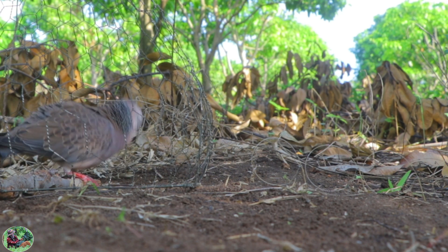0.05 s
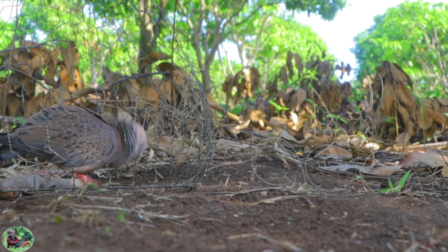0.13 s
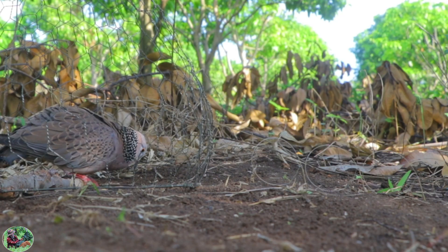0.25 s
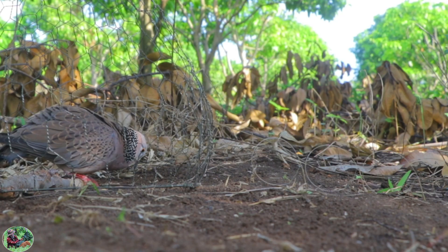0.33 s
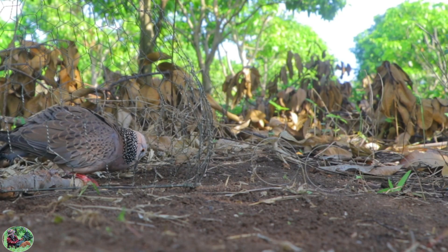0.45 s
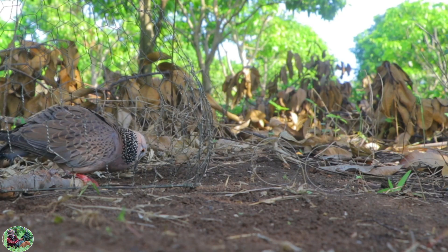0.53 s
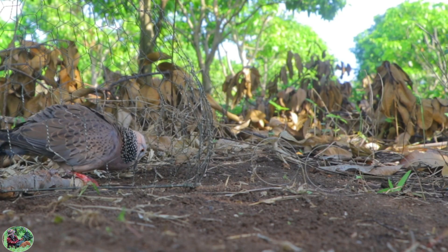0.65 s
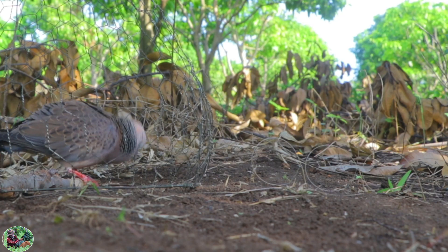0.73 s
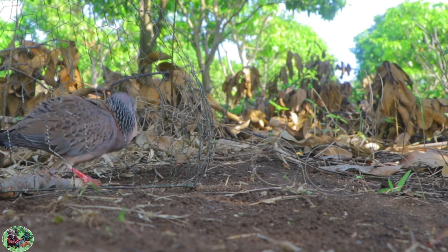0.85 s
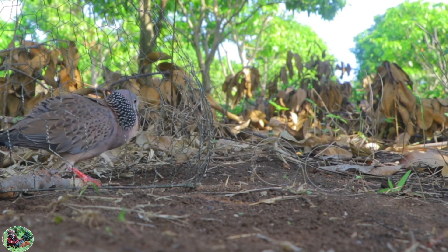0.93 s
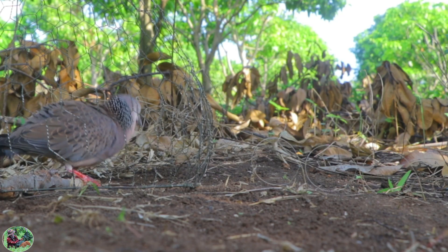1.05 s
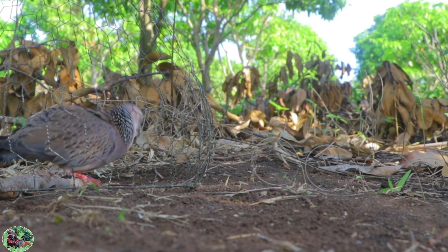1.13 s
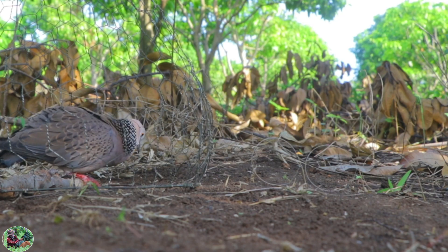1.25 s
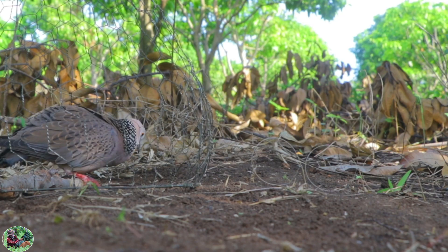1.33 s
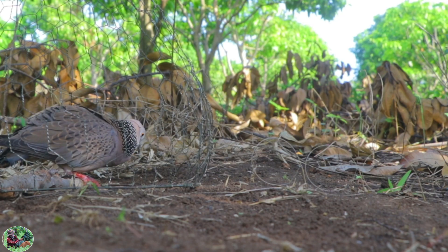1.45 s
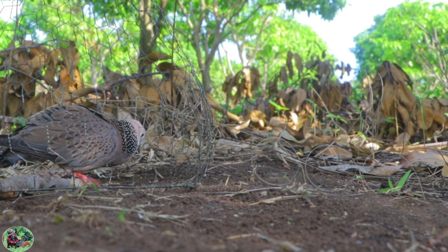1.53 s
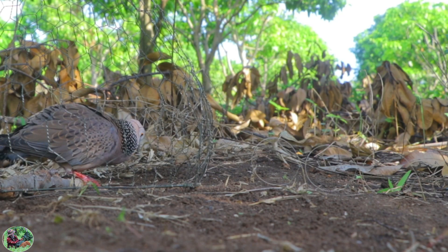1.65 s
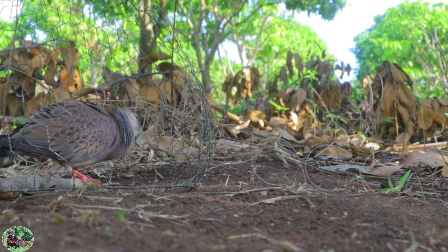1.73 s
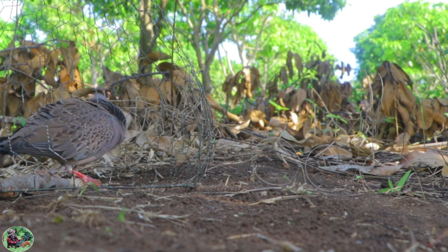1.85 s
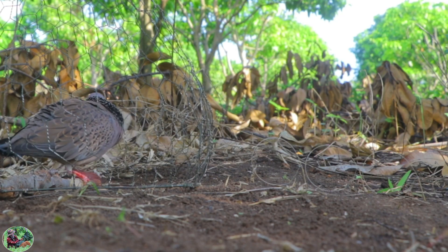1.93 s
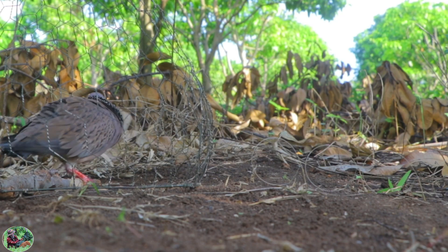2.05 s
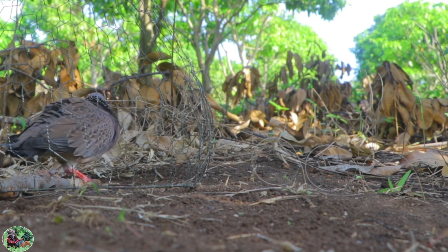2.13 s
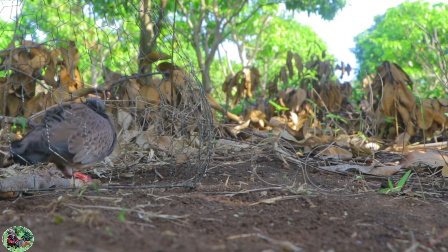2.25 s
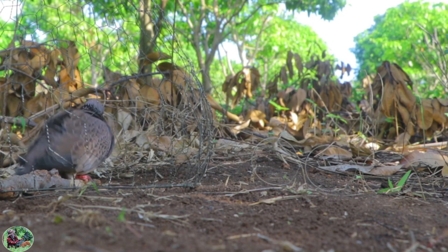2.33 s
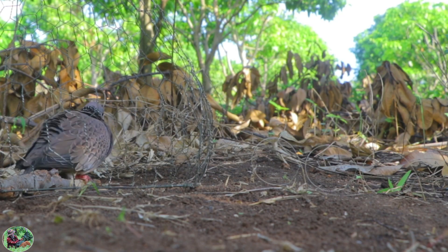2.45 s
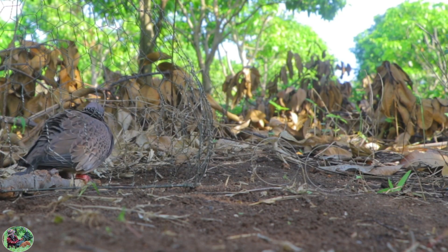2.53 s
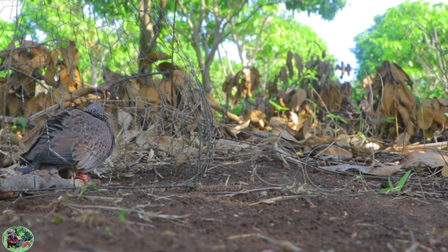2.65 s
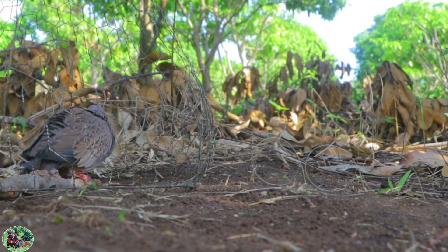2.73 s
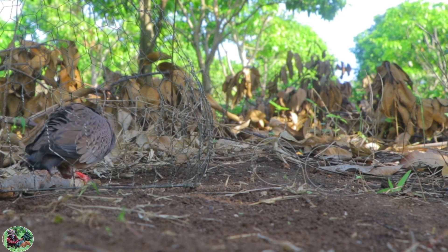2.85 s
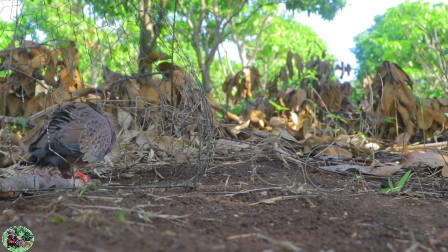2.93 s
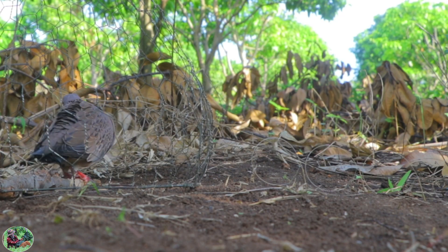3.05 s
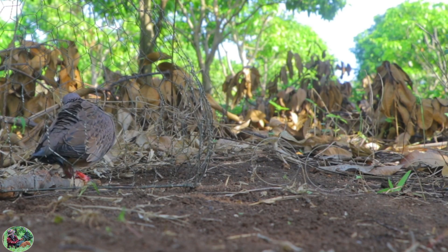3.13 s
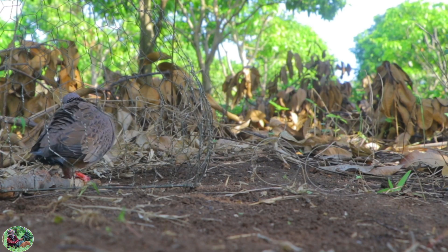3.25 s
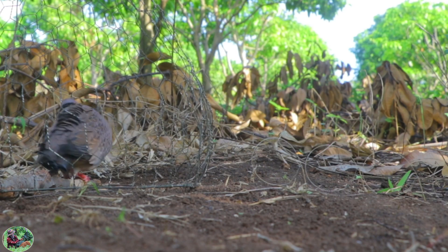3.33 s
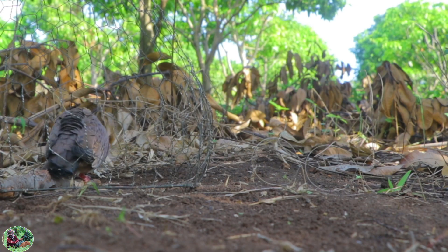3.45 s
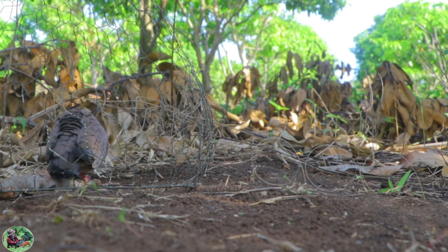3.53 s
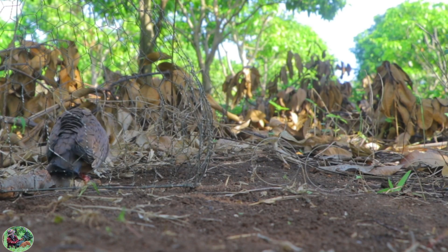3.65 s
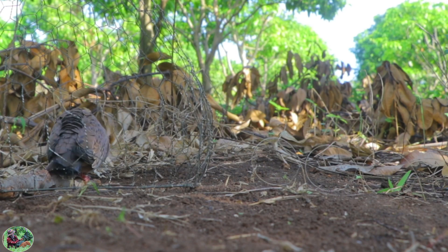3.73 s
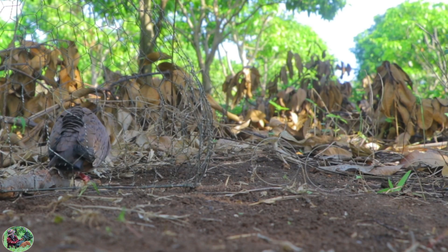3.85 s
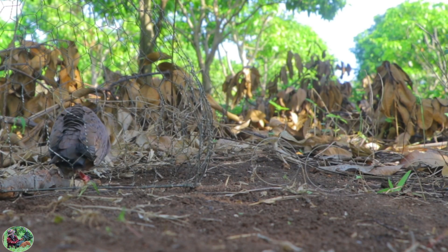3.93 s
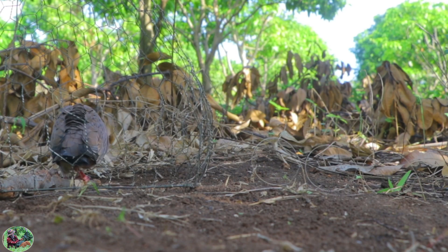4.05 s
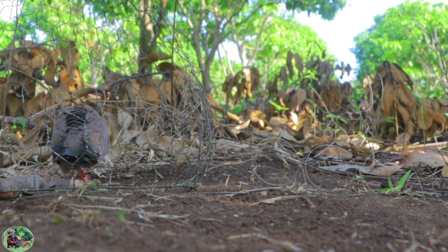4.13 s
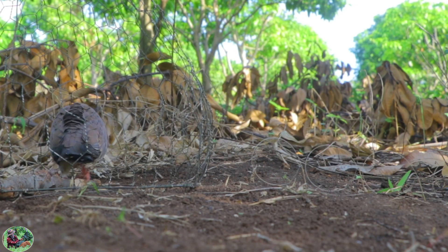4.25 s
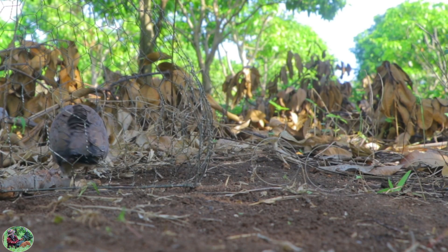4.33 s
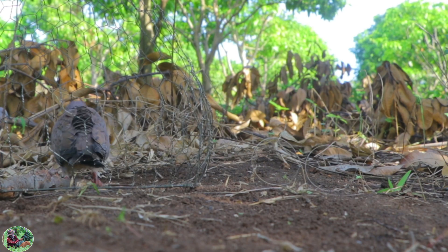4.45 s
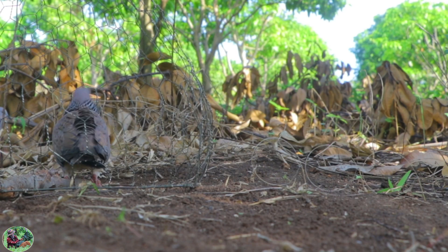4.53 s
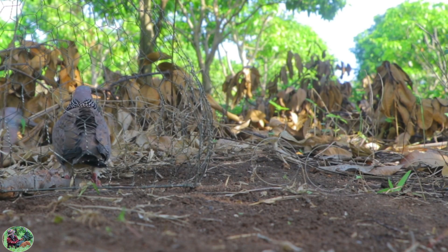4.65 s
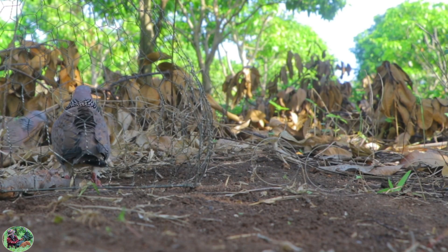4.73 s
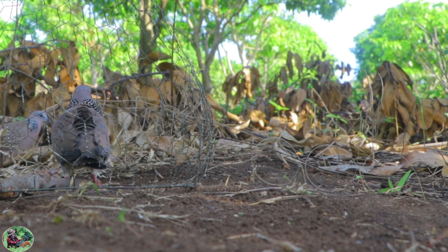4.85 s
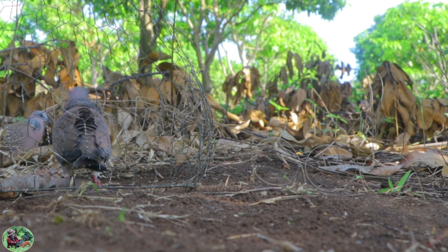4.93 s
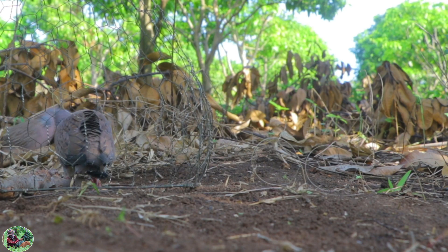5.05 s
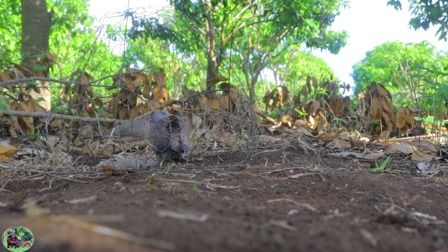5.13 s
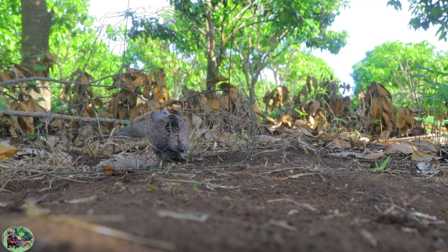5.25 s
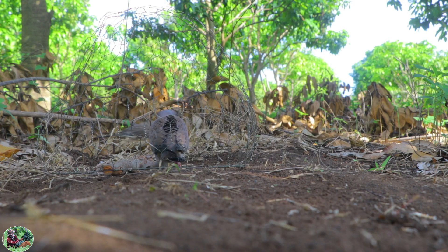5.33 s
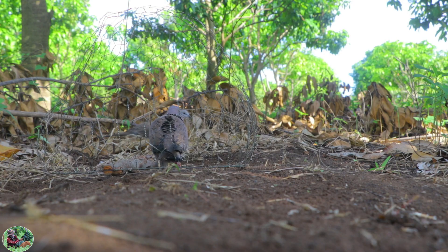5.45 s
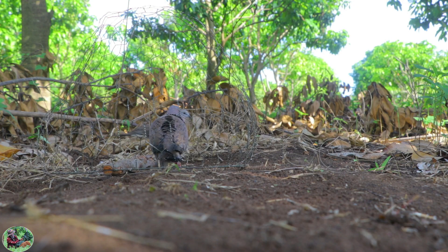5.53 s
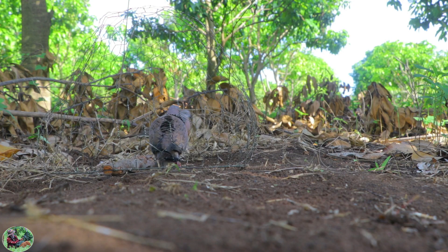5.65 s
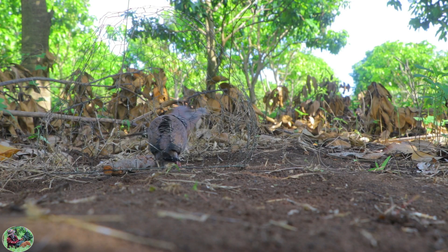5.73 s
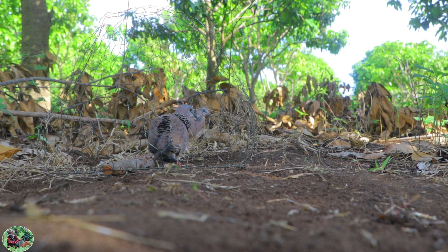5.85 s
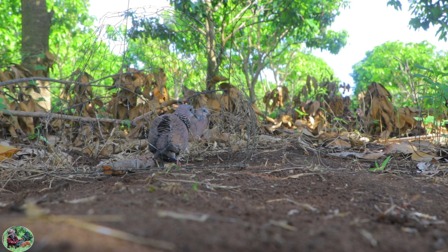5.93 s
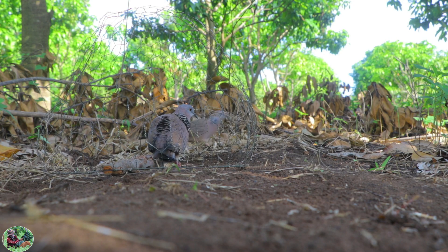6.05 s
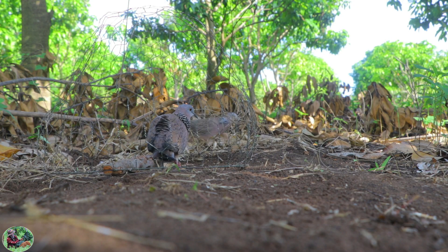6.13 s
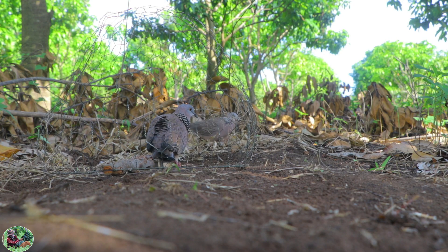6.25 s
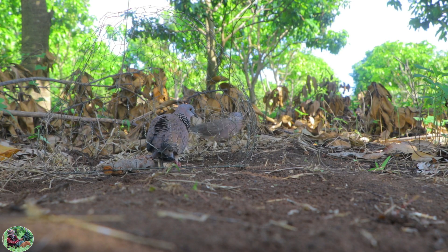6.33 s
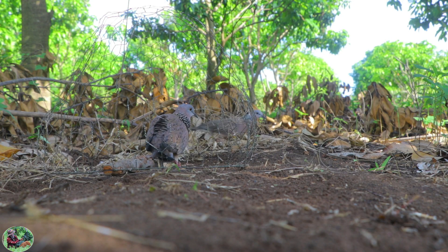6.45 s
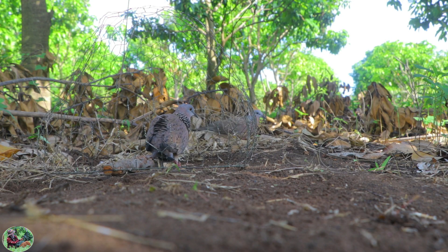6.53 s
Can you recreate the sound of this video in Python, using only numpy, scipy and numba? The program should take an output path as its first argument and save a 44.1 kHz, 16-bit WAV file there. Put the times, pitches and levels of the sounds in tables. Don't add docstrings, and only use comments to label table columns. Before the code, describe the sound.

Steady high cicada drone and airy leaf hiss surround a loud, near dove in a grove. It repeats a short, rough coo and a longer, clearer one four times during the first four seconds. Automatic level control pushes the background down under each coo and lets it slowly rise again. Afterwards only insects, thin cricket lines, low engine rumble, a crisp leaf crackle and faint far bird calls remain.

```python
import sys
import numpy as np
from scipy import signal
from scipy.io import wavfile
from scipy.ndimage import uniform_filter1d, minimum_filter1d
from numba import njit

SR = 44100
rng = np.random.default_rng(int(sys.argv[2]) if len(sys.argv) > 2 else 0)


def put_to_file(sound):
    columns = np.atleast_2d(sound).T
    safe = np.clip(columns, -1, 1)
    whole_steps = np.round(safe * 32767)
    wavfile.write(sys.argv[1], SR, whole_steps.astype(np.int16))


def voltage_ratio(decibels):
    exponent = np.asarray(decibels, float) / 20
    return 10 ** exponent


N = 290619
TIME = np.arange(N) / SR

# start_s, end_s, top_pitch_hz
SHORT_COOS = [
    (0.2045, 0.366, 615),
    (1.2135, 1.378, 612),
    (2.345, 2.515, 630),
    (3.492, 3.663, 636),
]
# start_s, flip_to_clear_voice_s, drop_back_s, end_s, clear_pitch_hz
LONG_COOS = [
    (0.465, 0.521, 0.697, 0.889, 709),
    (1.472, 1.538, 1.704, 1.877, 717),
    (2.601, 2.663, 2.858, 3.023, 726),
    (3.752, 3.829, 3.975, 4.157, 708),
]


def rms_one(x):
    return x / np.sqrt(np.mean(x ** 2) + 1e-20)


def at_hz(points, hz):
    point_hz, value = np.transpose(points)
    return np.interp(np.log(hz), np.log(point_hz), value)


def drift(rate_hz):
    r = np.exp(-16 * np.pi * rate_hz / SR)
    noise = rng.standard_normal(N // 8 + 9002)
    slow = signal.lfilter([1], [1, -2 * r, r * r], noise)[9000:]
    return np.interp(np.arange(N) / 8, np.arange(len(slow)), rms_one(slow))


def resonance(x, hz, width_hz):
    r = np.exp(-np.pi * width_hz / SR)
    top = np.array([1, 0, -1]) * (1 - r * r) / 2
    return signal.lfilter(top, [1, -2 * r * np.cos(2 * np.pi * hz / SR), r * r], x)


def swell(start_s, end_s):
    return np.sin(np.pi * np.clip((TIME - start_s) / (end_s - start_s), 0, 1)) ** 2


def placed(x, lean_db, lead):
    right = np.interp(np.arange(N) - lead, np.arange(N), x)
    return np.array([x * voltage_ratio(lean_db / 2), right * voltage_ratio(-lean_db / 2)])


def air(patchy_db):
    # pitch_hz, level_db (per Hz)
    hiss = [(15, -30), (28, -19), (66, -3), (110, -9), (208, -13), (356, -11.5), (715, -15.5),
            (1360, -18.5), (2330, -22), (3980, -24.5), (7000, -26.5), (10000, -26), (12500, -33),
            (15200, -39.5)]
    # pitch_hz, likeness (1 = same)
    likeness = [(60, .92), (100, 0.45), (140, 0.43), (220, 0.021), (1100, 0.17), (3000, 0)]
    # pitch_hz, left_over_right_db
    lean = [(60, 3.5), (180, -1), (540, -2.0), (1630, -3), (4920, -2), (14800, -2)]
    out, together = 0, drift(2.5)
    edges = 24 * 2 ** np.arange(0, 9.7, 1 / 3)
    white = rng.standard_normal((2, 2, N))
    for k, (low, high) in enumerate(zip(edges, edges[1:])):
        band = signal.butter(2, [low, high], "band", fs=SR, output="sos")
        mid, side = signal.sosfilt(band, white[k % 2])
        hz = np.sqrt(low * high)
        alike, lean_db = np.clip(at_hz(likeness, hz), -1, 1), at_hz(lean, hz)
        flicker_db = patchy_db * (0.35 * together + drift(9.1))
        gain = voltage_ratio(at_hz(hiss, hz) + flicker_db) * voltage_ratio(np.array([[lean_db], [-lean_db]]) / 2)
        out = out + gain * (np.sqrt(1 + alike) * mid + np.sqrt(1 - alike) * side * [[1], [-1]])
    return voltage_ratio(-24) * rms_one(out)


def engine():
    # pitch_hz, width_hz, level_db
    hum = [
        (43.6, 15, -26),
        (88.1, 9.4, -29.5),
    ]
    out = 0
    for hz, width_hz, db in hum:
        noise = rng.standard_normal(N + SR)
        tone = resonance(resonance(noise, hz, width_hz), hz, width_hz)
        out = out + voltage_ratio(db) * rms_one(tone[SR:])
    return out


def cicadas():
    # pitch_hz, width_hz, level_db
    bodies = [(4477, 220, -2.5), (4726, 160, -0.5), (4834, 200, -2.5), (5023, 110, 1), (5190, 57, -1)]
    # middle_s, half_length_s, extra_db
    swells = [(0.04, 0.18, 2.5), (0.63, 0.26, 0.5), (1.05, 0.23, 1), (1.34, 0.3, 2), (1.822, .32, 4),
              (2.343, 0.28, 7.5), (2.54, 0.099, 7.5), (2.932, 0.14, 4.5), (3.65, 0.29, 2),
              (4.466, 0.22, 3.5), (5.185, 0.13, 2.5), (5.66, 0.15, 1.5), (6.14, 0.61, 3.5)]
    sides = []
    for throb_hz in (49.5, 50.5):
        unsteady_hz = throb_hz * (1 + .04 * drift(3))
        throb = 1 + 0.05 * np.sin(2 * np.pi * np.cumsum(unsteady_hz) / SR)
        chorus = 0
        for hz, width_hz, db in bodies:
            clicks = rng.standard_normal(N) * throb * voltage_ratio(2.0 * drift(100) + 2.2 * drift(13))
            ringing = resonance(resonance(clicks, hz, width_hz * 1.5), hz, width_hz * 1.5)
            chorus = chorus + voltage_ratio(db) * ringing
        sides.append(rms_one(chorus))
    swell_db = sum(db * swell(s - half, s + half) for s, half, db in swells)
    return np.array(sides) * voltage_ratio(-29 + swell_db)


def crickets():
    # start_s, end_s, level_db
    chirps = [(0, 0.192, -41), (0.289, 0.794, -41.5), (1.497, 2.05, -37), (.8, 1.046, -43),
              (3.72, 3.85, -44.5), (4.097, 4.303, -46), (5.3, 5.42, -38), (5.56, 5.738, -38),
              (5.874, 6.09, -39)]
    wings = [7500, 7640, 7740]
    lines = []
    for side in "LR":
        noise = [rng.standard_normal(N) for hz in wings]
        lines.append(sum(resonance(resonance(x, hz, 80), hz, 80) for x, hz in zip(noise, wings)))
    loudness = voltage_ratio(-54.5) + sum(voltage_ratio(db) * swell(start, end) ** .5 for start, end, db in chirps)
    return rms_one(np.array(lines)) * loudness


def far_birds():
    # start_s, end_s, from_hz, to_hz, level_db
    calls = [
        (5.632, 6.16, 326.7, 342.3, -33),
        (5.928, 6.027, 2135, 2240, -41),
        (5.933, 6.05, 2500, 2490, -41),
        (6.31, 6.383, 2210, 2240, -41),
        (6.32, 6.4, 2460, 2460, -42),
    ]
    # pitch_hz, left_over_right_db
    far_lean = [(330, 1), (2200, 9), (2450, 13.5)]
    out = 0
    for start, end, from_hz, to_hz, db in calls:
        hz = np.interp(TIME, [start, end], [from_hz, to_hz]) * (1 + 0.013 * drift(41.6))
        loudness = voltage_ratio(db + 2.1 * drift(13)) * swell(start, end) ** .5
        tone = np.sin(2 * np.pi * np.cumsum(hz) / SR) * loudness
        out = out + placed(tone, at_hz(far_lean, from_hz), 0)
    return out


def rustles():
    # middle_s, half_length_s, level_db
    steps = [
        (2.057, 0.042, -27.5),
        (3.204, 0.055, -29),
        (4.412, 0.045, -28),
        (5.731, .03, -23.5),
    ]
    strength = voltage_ratio(3.7 * rng.exponential(1, (2, N)).clip(0, 4))
    clicks = rng.standard_normal((2, N)) * strength * (rng.random((2, N)) < .12)
    leaf = signal.butter(2, [600, 6000], "band", fs=SR, output="sos")
    crackle = rms_one(signal.sosfilt(leaf, clicks))
    return crackle * sum(voltage_ratio(db) * swell(s - half, s + half) for s, half, db in steps)


def gulps():
    # start_s, peak_db, pitch_hz
    pops = [
        (0.109, -28.5, 795),
        (0.178, -28.5, 910),
        (1.118, -33, 830),
        (1.186, -29.5, 960),
        (2.319, -26.5, 950),
        (3.469, -26.5, 1010),
    ]
    out = np.zeros(N)
    for s, peak_db, hz in pops:
        age = np.maximum(TIME - s, 0)
        fade = np.exp(-age / 0.0032) * np.minimum(age / 0.00096, 1)
        out += voltage_ratio(peak_db + 16.0) * np.sin(2 * np.pi * hz * age) * fade
    return out


def short_note(start, end, top_hz):
    # share_of_length, pitch_hz, level_db, sideband_db, creak_db
    scoop = [(0, 438, -19, -8, -8), (0.034, 468, -20, -8, -10), (0.043, 508, -1.5, -11, -17),
             (.11, 568, -1.5, -7, -19)]
    # share_of_length, level_db, sideband_db, creak_db
    scoop_top = (0.19, -3, -1.5, -20)
    # share_of_length, pitch_hz, level_db, sideband_db, creak_db
    body = [(0.4, 602, -6.8, 1, -20), (0.58, 599, -6.2, 0, -20), (0.79, 554, -6.8, -4, -20),
            (0.903, 490, -15.5, -8, -17), (0.95, 427, -20.5, -10, -12), (0.98, 405, -36, -8, -12)]
    rows = []
    for share, hz, db, side_db, creak_db in scoop + [(scoop_top[0], top_hz, *scoop_top[1:])] + body:
        flutter_hz = 104.44 if side_db >= -3 else 115.2
        rows.append((start + share * (end - start), hz, db, flutter_hz, side_db, creak_db))
    return rows


def long_note(start, flip, drop, end, clear_hz):
    # after_start_s, pitch_hz, level_db, sideband_db, creak_db
    scoop = [(0, 402, -25, -8, -12), (0.012, 432, -19, -8, -10), (0.024, 540, -3.5, -11, -16),
             (0.036, 587, -3, -7, -22)]
    # pitch_hz, level_db, sideband_db, creak_db
    before_flip = (625, -5, -8, -22)
    # share_of_tail, pitch_hz, level_db, sideband_db, creak_db
    tail_shape = [(0.035, 587, -8.8, -15, -22), (0.32, 556, -8.3, -10, -22), (0.62, 529, -8.1, -9.5, -21),
                  (0.8, 514, -9, -10, -19), (0.875, 504, -13, -12, -15), (0.93, 450, -19, -10, -12),
                  (0.975, 406, -35, -8, -12)]
    flip_s = 0.009
    opening = [(start + s, *rest) for s, *rest in scoop] + [(flip - flip_s, *before_flip)]
    clear = []
    for u in np.arange(9) / 8:
        hz = clear_hz - (clear_hz - 665) * u ** 2.2
        clear.append((flip + u * (drop - flip), hz, -4.8 + .6 * u, -33, -30))
    tail = [(drop + share * (end - drop), *rest) for share, *rest in tail_shape]
    return [(s, hz, db, 121.7 if s > flip - flip_s else 115.2, side_db, creak_db)
            for s, hz, db, side_db, creak_db in opening + clear + tail]


def phrases():
    notes = []
    for short, long in zip(SHORT_COOS, LONG_COOS):
        notes += [short_note(*short), long_note(*long)]
    return notes


def dove():
    # middle_s, half_length_s, extra_db
    catches = [
        (0.535, .02, 8),
        (2.675, 0.03, 12),
        (3.835, .012, 10),
        (3.853, 0.012, 14),
        (3.885, 0.012, 8),
        (3.905, 0.012, 9),
        (4.04, 0.08, 6),
    ]
    notes = phrases()
    throat_time = TIME + .0015
    s, *columns = np.transpose(np.concatenate(notes))
    pitch_hz, level_db, flutter_hz, side_db, creak_db = [np.interp(throat_time, s, c) for c in columns]
    sounding = sum((throat_time > note[0][0]) & (throat_time < note[-1][0]) for note in notes)
    sounding = uniform_filter1d(sounding * 1., size=90)

    catch_db = sum(db * swell(at - half, at + half) for at, half, db in catches)
    side_db = side_db + catch_db * (side_db < -20)
    creak_db = creak_db + catch_db
    side = voltage_ratio(side_db + 1.55)
    creak = voltage_ratio(creak_db + 0.17 * np.minimum(side_db + 4.0, 0))

    unsteady = side ** .6
    beat_hz = flutter_hz * (1 + 0.0836 * unsteady * drift(40.4))
    half_beat = np.exp(1j * np.pi * np.cumsum(beat_hz) / SR)
    beat = half_beat ** 2
    voice_hz = pitch_hz * (1 + 0.0033 * drift(60) + 0.0213 * unsteady * drift(50))
    carrier = np.exp(2j * np.pi * np.cumsum(voice_hz) / SR)

    upper = side * voltage_ratio(1.5 * drift(45)) * (1 + .4 * side * half_beat.real)
    upper = upper / np.sqrt(1 + ((pitch_hz + flutter_hz) / 800) ** 16)
    outer = voltage_ratio(-14) * upper * beat ** 2 + voltage_ratio(-23) * upper ** 1.4 / beat
    shape = 1 + upper * beat + outer * np.exp(-1j * 1.0)
    shape = shape + creak * (drift(120) + 1j * drift(170))
    voice = carrier * shape / np.sqrt(1 + upper ** 2 + 2 * creak ** 2)

    overtone_db = -44.5 + 18 * np.clip((690 - pitch_hz) / 150, 0, 1.8)
    overtone_shape = 1 + .5 * upper * beat + 1.1 * upper / beat + 5.4 * creak * drift(87)
    overtone = voltage_ratio(overtone_db) * carrier ** 2 * overtone_shape
    third = voltage_ratio(-56) * carrier ** 3
    throat = np.sqrt(2) * voltage_ratio(level_db + 0.65) * sounding * (voice + overtone + third).real
    return signal.sosfilt(signal.butter(4, 380, "high", fs=SR, output="sos"), throat)


@njit
def follow(wanted_db, attack, release):
    cut, out = wanted_db[0], np.empty(len(wanted_db))
    for i in range(len(wanted_db)):
        cut += (wanted_db[i] - cut) * (attack if wanted_db[i] > cut else release)
        out[i] = cut
    return out


def ducking():
    attack_s, quick_release_s, slow_release_s, quick_share = 0.015, 0.11, 0.41, 0.35
    grips = [(s + 0.013, s + 0.013 + 0.079, 21) for s, *_ in SHORT_COOS]
    grips += [(s + 0.03, drop + 0.041, 20.5) for s, _, drop, *_ in LONG_COOS]
    wanted_db = 0
    for start, end, db in grips:
        gripped = np.clip((TIME - start) * SR + 1, 0, 1) * np.clip((end - TIME) * SR, 0, 1)
        wanted_db = wanted_db + db * gripped
    wanted_db[0] = 9
    quick = follow(wanted_db, 1 / (attack_s * SR), 1 / (quick_release_s * SR))
    slow = follow(wanted_db, 1 / (attack_s * SR), 1 / (slow_release_s * SR))
    return quick_share * quick + (1 - quick_share) * slow


def scene():
    # delay_s, level_db
    echoes = [(.011, -31.5), (.023, -36), (.041, -29.5), (.067, -39)]
    bird = dove() * voltage_ratio(ducking()) + gulps()
    near = placed(bird, -.8, 3.0)
    for k, (s, db) in enumerate(echoes):
        lag = int(s * SR)
        near[k % 2, lag:] += voltage_ratio(db) * bird[:-lag]
    grove = air(patchy_db=1.04) + placed(engine(), 0.84, 0) + cicadas() + crickets()
    return grove + far_birds() + rustles() + near


def roll_off(x):
    return signal.sosfilt(signal.butter(12, 15390, fs=SR, output="sos"), x)


def record(dry):
    held = signal.sosfilt(signal.butter(2, 32, "high", fs=SR, output="sos"), dry) * voltage_ratio(-ducking())
    room = np.minimum(voltage_ratio(.25) / (np.abs(held).max(axis=0) + 1e-9), 1)
    held = held * uniform_filter1d(minimum_filter1d(room, size=160), size=80)
    mix = signal.sosfilt(signal.ellip(10, .1, 60, 15250, fs=SR, output="sos"), held)
    return roll_off(mix)


dry = scene()
out = record(dry)
put_to_file(out)
```